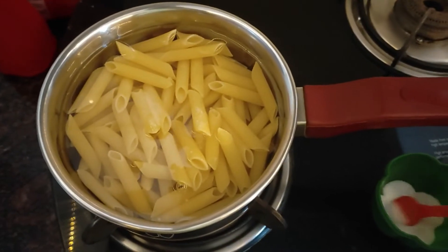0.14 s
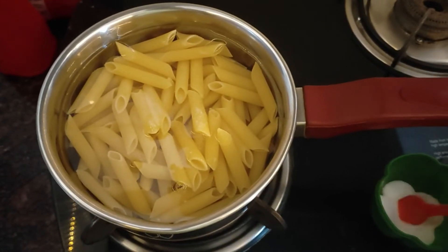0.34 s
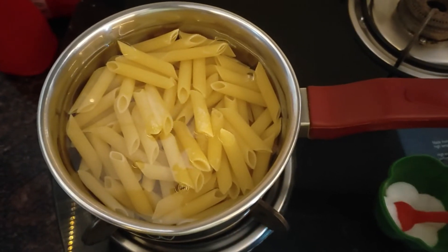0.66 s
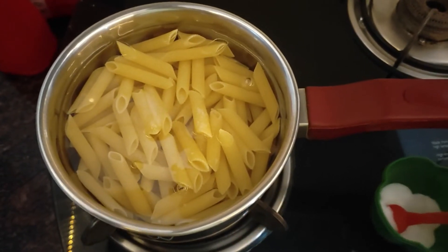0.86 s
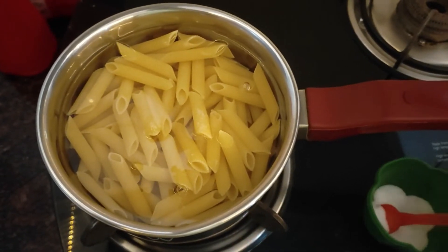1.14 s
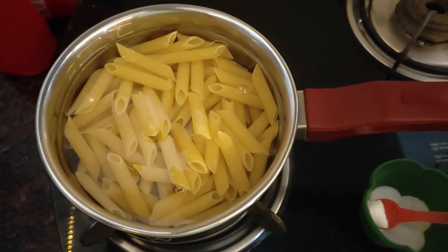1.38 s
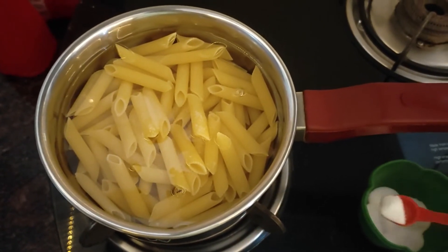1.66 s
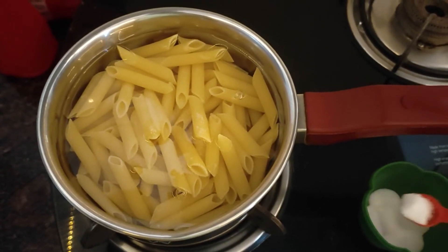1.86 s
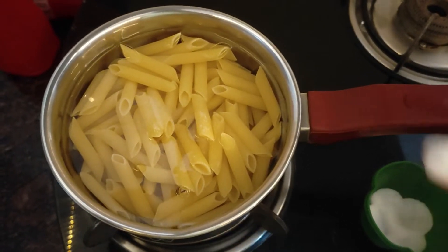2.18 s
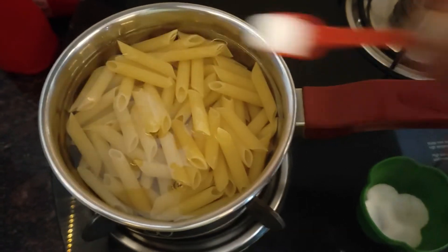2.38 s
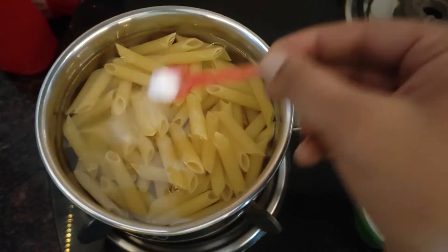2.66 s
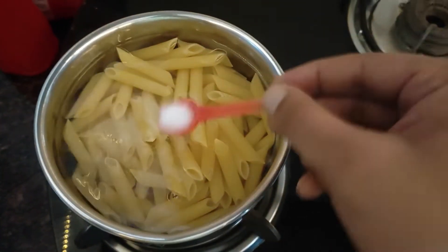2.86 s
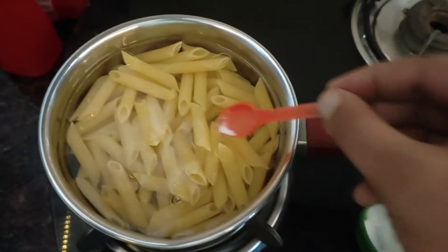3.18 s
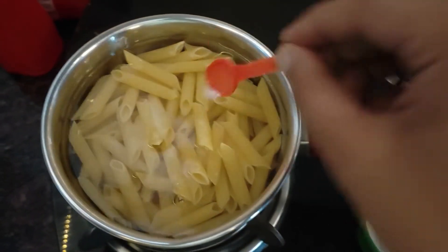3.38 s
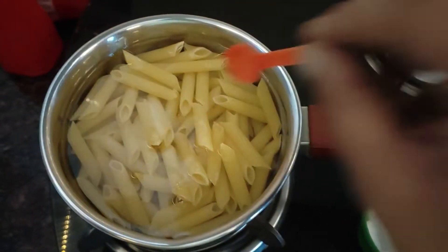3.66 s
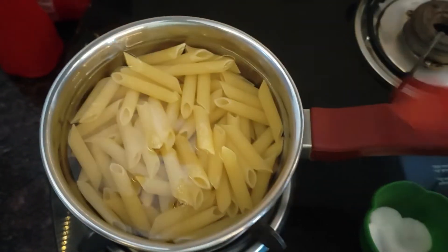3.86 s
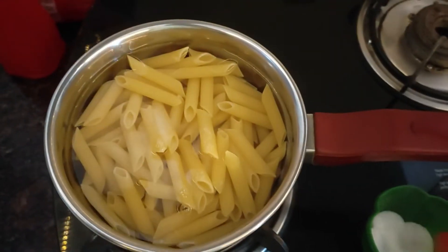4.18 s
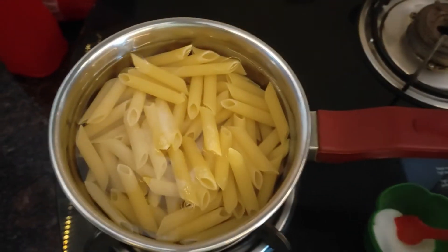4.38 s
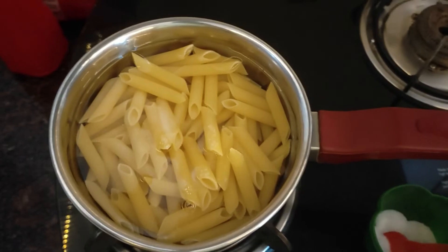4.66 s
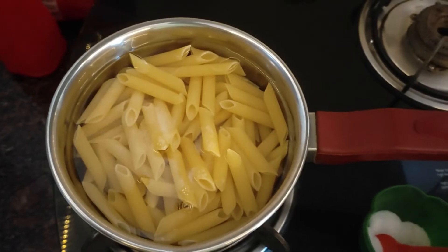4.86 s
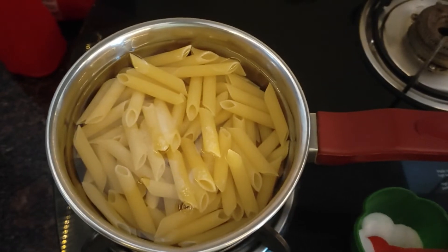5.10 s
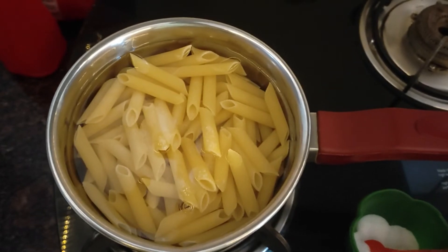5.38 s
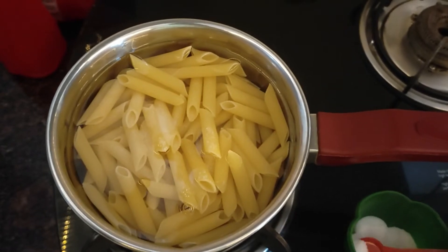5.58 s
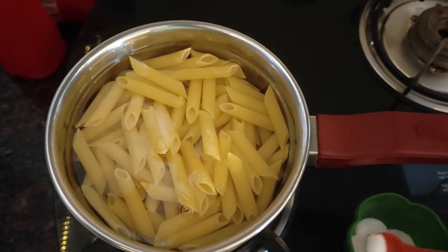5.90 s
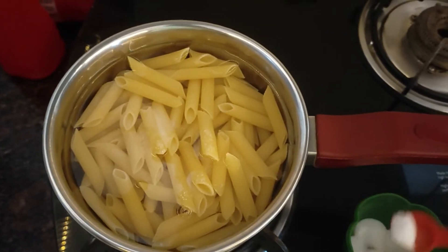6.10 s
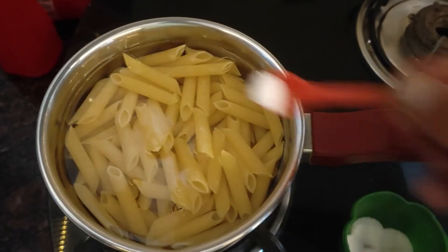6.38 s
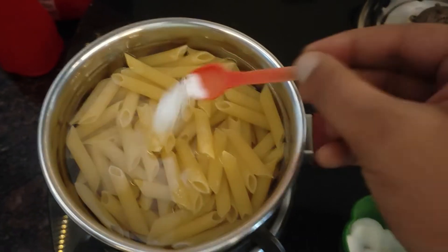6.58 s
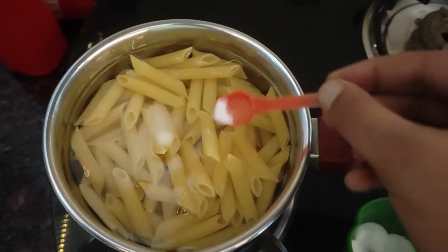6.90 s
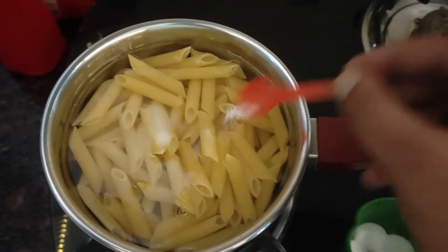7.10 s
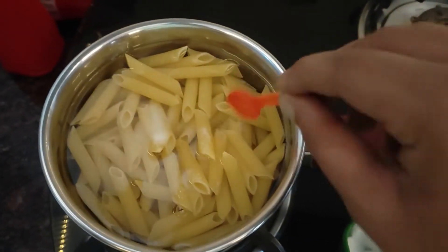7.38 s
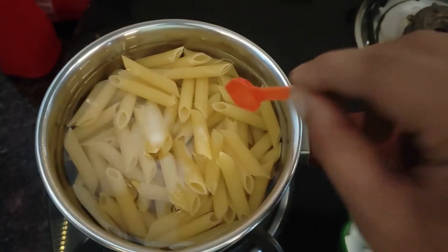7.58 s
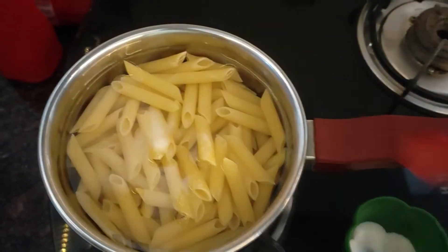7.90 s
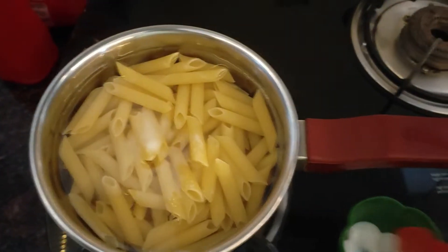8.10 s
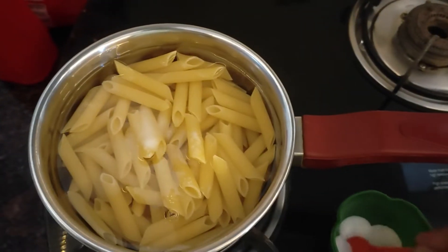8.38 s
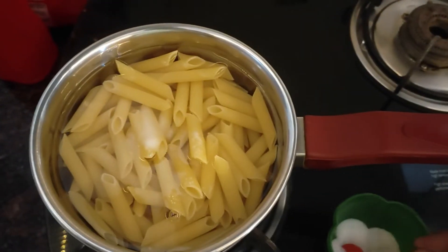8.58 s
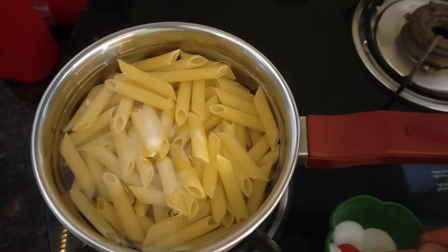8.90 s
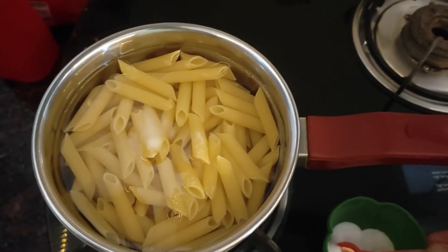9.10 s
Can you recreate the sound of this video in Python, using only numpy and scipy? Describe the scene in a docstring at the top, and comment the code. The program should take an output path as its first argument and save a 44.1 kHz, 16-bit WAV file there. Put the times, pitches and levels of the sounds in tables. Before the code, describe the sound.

Low flame rumble and fan hum in a small kitchen, a muffled engine swelling past beyond the walls, with crunchy salt scoops and spoon clacks.

```python
"""In a small kitchen, a gas burner rumbles and hisses (shaped noise) under a steel pot of pasta, by a humming fan.
A motor vehicle revs up and passes outside, dull through the walls: engine harmonics and noise, tyre noise,
and low street drones from sines and noise.
A plastic spoon scoops salt from a bowl: knocks, taps and a counter bump ring decaying modes, scrapes are bursts
of noisy grains, ticks are tiny sine pops. Thin whistles of narrow noise swell and fade."""
import sys
import numpy as np
from scipy import signal
from scipy.fft import rfft, irfft, next_fast_len
from scipy.io import wavfile
from scipy.ndimage import uniform_filter1d

SR = 44100
rng = np.random.default_rng(int(sys.argv[2]) if len(sys.argv) > 2 else 0)


def transcribe(u):
    """Save the signal u as a 16-bit wav file named by the first command-line argument.

    u: samples, shape (n,) or (channels, n), limited to [-1, 1]; the rate is SR.
    q: integer samples, one column per channel.
    """
    v = np.clip(np.atleast_2d(u).T, -1, 1)
    q = np.round(v * 32767).astype(np.int16)
    wavfile.write(sys.argv[1], SR, q)


N = 407925
TIME = np.arange(N) / SR


def undb(db):
    """Decibels to gain."""
    return 10 ** (np.asarray(db) / 20)


def unit(x):
    """Scale to rms 1."""
    return x / np.sqrt(np.mean(x ** 2))


def curves(table):
    """Each column of a timed table, sample by sample."""
    s, *columns = np.transpose(table)
    return [np.interp(TIME, s, c) for c in columns]


def db_at(spectrum, hz):
    """Read a spectrum on a log-frequency axis; past its ends it falls 60 dB per octave."""
    f, db = np.transpose(spectrum)
    octave, points = np.log2(np.maximum(hz, 1)), np.log2(f)
    outside = np.abs(octave - np.clip(octave, points[0], points[-1]))
    return np.interp(octave, points, db) - 60 * outside


def colour(x, spectrum, tilt_db=0):
    """Shape a sound by a spectrum and a tilt in dB per octave; rms 1."""
    size = next_fast_len(len(x))
    hz = np.arange(size // 2 + 1) * SR / size
    gain = undb(db_at(spectrum, hz) + tilt_db * np.log2(hz + 1))
    return unit(irfft(rfft(x, size) * gain, size)[:len(x)])


def noise(spectrum):
    """Turbulence with a given spectrum."""
    return colour(rng.standard_normal(N), spectrum)


def walk(rate):
    """Smooth random wander with rms 1, taking about rate steps a second."""
    k = int(SR / rate)
    steps = np.repeat(rng.standard_normal(N // k + 2), k)[rng.integers(k):][:N]
    return unit(uniform_filter1d(uniform_filter1d(steps, k), k))


def turn(hz):
    """Phase of a moving frequency, from a random start."""
    return 2 * np.pi * np.cumsum(hz) / SR + rng.uniform(0, 2 * np.pi)


def add(out, s, sound):
    """Mix a sound in at time s."""
    i = int(s * SR)
    out[i:i + len(sound)] += sound[:N - i]


def onset(s, rise_s):
    """A smooth step from 0 to 1 around time s."""
    return .5 + .5 * np.tanh((TIME - s) / (2 * rise_s))


def swell(middle_s, length_s):
    """A smooth rise from 0 to 1 and back."""
    return np.cos(np.pi * np.clip((TIME - middle_s) / length_s, -.5, .5)) ** 2


def passing(loudest_s, reach_s, falloff_db=15.5):
    """Level in dB of a source driving by; in reach_s it covers its own distance from the house."""
    return -falloff_db * np.log10(1 + ((TIME - loudest_s) / reach_s) ** 2)


# Flame rumble and room. Each row: frequency in Hz, density in dB per Hz.
FLAME_SPECTRUM = [(36, -25.5), (50, -10.5), (62, -4.5), (74, -13), (90, 1), (105, 1.5), (124, -11),
                  (135, -12), (180, -12), (200, -6.5), (225, -17.5), (250, -24.5), (292, -19.5), (320, -19),
                  (380, -14), (410, -23), (500, -16.5), (700, -22.5), (850, -43)]
# Gas jet hiss. Each row: frequency in Hz, density in dB per Hz.
JET_SPECTRUM = [(600, -0.5), (800, 5.5), (1250, 0.5), (1800, -5), (2350, -9), (2650, -16.5), (3350, -19),
                (3750, -28.5), (4900, -28.5), (6200, -22.5), (7600, -27.5)]


def burner(flame_db=-41.5, jet_db=-56, flicker_db=1.37):
    """The flame rumbles steadily; the gas jet hisses through the ports and flickers."""
    flame = noise(FLAME_SPECTRUM) * undb(flame_db)
    jet = noise(JET_SPECTRUM) * undb(jet_db + flicker_db * walk(15))
    return flame + jet


# Fan lines. Each row: multiple of the blade rate, level in dB rms before waver, waver in dB.
FAN_LINES = [(2.99, -58, 2), (4.007, -49, 1.5), (5.99, -44.5, 1.5), (6.98, -52, 1.9), (13.98, -56.5, 3.1)]
# Faint, broken hum beside them. Each row: frequency in Hz, density in dB per Hz.
HUM_SPECTRUM = [(276, -18.5), (290, 1.5), (304, -16.5)]


def fan(blade_hz=14.2, hum_db=-54):
    """Sines near multiples of the blade rate waver in level, beside a hum of narrow, unsteady noise."""
    lines = 0
    for multiple, db, waver_db in FAN_LINES:
        line = unit(np.sin(turn(np.full(N, multiple * blade_hz))))
        lines = lines + line * undb(db + waver_db * walk(5))
    return lines + noise(HUM_SPECTRUM) * undb(hum_db)


# What the walls let through. Each row: frequency in Hz, density in dB per Hz.
WALL_SPECTRUM = [(110, -19.5), (128, -4), (145, -2.5), (160, -11), (174, -2.5), (184, -6), (198, -4),
                 (218, -1), (235, -5.5), (255, -14.5), (278, 5), (295, 2), (335, -9.5), (410, -8.5),
                 (445, -11.5), (470, -21.5), (530, -12), (570, -15.5), (612, -14), (720, -24)]


def engine_orders(cycle_hz, orders, odd_gain, smear, rough, drift=1.47, fade_db=2.0):
    """A group of engine harmonics; echoes along the street make each one fade and smear."""
    phase, tones, power = turn(cycle_hz), 0, 0
    for k in orders:
        # the walls' response changes slowly, so read it every 500 samples
        wall_db = np.interp(TIME, TIME[::500], db_at(WALL_SPECTRUM, k * cycle_hz[::500]))
        gain = undb(wall_db) * (odd_gain if k % 2 else 1)
        # the echo paths change as it drives, so the harmonics slide out of step
        angle = k * phase + rng.uniform(0, 2 * np.pi) + drift * walk(2) + smear * walk(10)
        fading = (1 + smear * walk(10)) * undb(fade_db * walk(2.464))
        tones = tones + gain * fading * np.sin(angle)
        power = power + gain ** 2
    edges = np.array([orders[0] - .5, orders[-1] + .5]) * np.median(cycle_hz)
    band = signal.butter(4, edges, "bandpass", fs=SR, output="sos")
    roar = signal.sosfilt(band, noise(WALL_SPECTRUM))
    # dividing by the total power evens out the level as the harmonics move
    return unit(unit(tones / np.sqrt(power)) + rough * unit(roar))


# Single exhaust notes that hum in the room. Each row: middle in seconds, length in seconds,
# order (multiple of the working cycle), level in dB rms at the middle before waver.
EXHAUST_SURGES = [(2.73, 1.1, 12, -46.5), (3.425, 0.64, 16, -35.5), (3.45, 0.53, 12, -55),
                  (3.834, 0.78, 16, -40.5), (4.16, 0.9, 12, -44.5), (4.353, 0.6, 16, -42.5),
                  (4.1, .5, 10, -46.5), (4.47, 0.39, 10, -38), (4.92, 0.56, 16, -38.5),
                  (4.85, 0.39, 14, -37.5), (5.4, 0.9, 14, -37.5), (5.25, .7, 10, -40), (2.8, 0.48, 22, -53),
                  (4.897, .8, 18, -44.5), (5.098, 0.87, 20, -42.5), (5.35, 0.46, 22, -44.5),
                  (5.1, 1.5, 30, -50.5), (4.7, 2.7, 6, -47), (8.3, 0.34, 14, -40), (8.25, .8, 7, -40),
                  (5.8, 0.59, 15, -36.5), (6.3, 0.66, 14, -38.5), (6.95, 0.84, 11, -32),
                  (7.4, 0.81, 15, -27.5), (7.445, 0.35, 9, -30), (7.496, 0.77, 10, -33.5),
                  (8.85, 1.4, 11, -39.5)]


def surges(cycle_hz, smear=.33, waver_db=2.0):
    """One harmonic after another stands out as the revs and the path into the room change."""
    out = 0
    for s, length_s, k, db in EXHAUST_SURGES:
        note = unit(np.sin(round(k) * turn(cycle_hz) + smear * walk(20)))
        out = out + note * swell(s, length_s) * undb(db + waver_db * walk(12))
    return out


# Engine speed. Each row: time in seconds, working cycles per second.
ENGINE_REVS = [(0, 16.4), (2.4, 16.5), (3.4, 18.1), (4, 19.3), (4.9, 20.45), (5.9, 20.4), (6.7, 20.1),
               (7.35, 19.35), (7.8, 19.2), (8.6, 20.6), (9.25, 19.7)]
# Deepest exhaust notes, heard from behind. Each row: order, loudest moment in seconds,
# level there in dB rms before waver, fade to either side in dB per second.
TAILPIPE_NOTES = [(5, 5.7, -33.5, 6.5), (7, 6.18, -35.5, 7)]
# Exhaust roar as the vehicle draws level. Each row: frequency in Hz, density in dB per Hz.
ROAR_SPECTRUM = [(150, -20), (172, -5), (200, -1), (228, -9.5), (255, -19.5), (280, -3), (300, 2),
                 (322, -10.5), (350, -11)]
# Rough rush of the engine under load. Each row: frequency in Hz, density in dB per Hz.
RUSH_SPECTRUM = [(165, -7), (190, 2), (225, -3), (255, -10.5), (295, 2.5), (345, -8), (375, -5), (415, -4),
                 (460, -14)]
THROTTLE_S, THROTTLE_RISE_S, IDLE_DB = 2.18, 0.25, -7.5  # opening, gradualness; idle level against open
# the tailpipe turns to face the house: moment, gradualness, gain in boom and drone
FACING_S, FACING_RISE_S, FACING_GAIN_DB = 5.52, 0.048, 2
ODD_FRONT_DB, ODD_REAR_DB = -15.5, 3  # odd orders against even, before and after the turn


def engine(boom_db=-38, drone_db=-38, buzz_db=-39.0):
    """It revs up and drives by: even firings dominate on the approach, odd orders once the tailpipe faces us."""
    cycle_hz, = curves(ENGINE_REVS)
    facing = onset(FACING_S, FACING_RISE_S)
    odd_db = ODD_FRONT_DB + (ODD_REAR_DB - ODD_FRONT_DB) * facing
    odd_gain = undb(odd_db)
    boom = engine_orders(cycle_hz, range(8, 13), odd_gain, smear=0.61, rough=0.58)
    boom = boom * undb(boom_db + passing(7.16, reach_s=2.21))
    drone = engine_orders(cycle_hz, range(13, 18), odd_gain, smear=0.55, rough=0.5)
    drone = drone * undb(drone_db + passing(6.4, reach_s=1.49))
    buzz = engine_orders(cycle_hz, range(18, 35), odd_gain, smear=0.7, rough=1.6)
    buzz = buzz * undb(buzz_db + passing(6.2, reach_s=2.04))
    throb = 0
    for k, loudest_s, db, fade in TAILPIPE_NOTES:
        note = unit(np.sin(round(k) * turn(cycle_hz) + 0.098 * walk(11.0)))
        level_db = db + odd_db - ODD_REAR_DB - fade * np.abs(TIME - loudest_s)
        throb = throb + note * undb(level_db + 2.0 * walk(8))
    exhaust = (boom + drone) * undb(FACING_GAIN_DB * facing)
    throttle = undb(IDLE_DB * (1 - onset(THROTTLE_S, THROTTLE_RISE_S)))
    roar = noise(ROAR_SPECTRUM) * swell(7.444, length_s=1.7) * undb(-29.5)
    rush = noise(RUSH_SPECTRUM) * swell(5.4, length_s=3.4) * undb(-41)
    return (exhaust + buzz + throb) * throttle + surges(cycle_hz) + roar + rush


# Tyre noise from the street. Each row: time in seconds, level in dB.
ROAD_LEVEL = [(0, -55.5), (.8, -54), (1.6, -57.5), (3.3, -57), (4.7, -51), (5.5, -46), (6, -48.5),
              (7.2, -48.5), (7.8, -53), (9.25, -52)]
# Tyre roar. Each row: frequency in Hz, density in dB per Hz.
TYRE_SPECTRUM = [(440, -33), (750, -1.5), (799, 1.5), (1050, -4.5), (1300, 1), (1420, -4.5), (1710, -1),
                 (2300, -7), (2890, -21), (3420, -20.5), (3730, -29.5), (5000, -30.5), (6500, -51.5),
                 (11000, -120)]
# High tyre hiss. Each row: frequency in Hz, density in dB per Hz.
HISS_SPECTRUM = [(3700, -11), (4900, -5), (5400, 0), (5750, 2), (6200, 6), (7600, 0.5)]


def tyres(flutter_db=1.15, hiss_db=-68.0, hiss_growth=0.97):
    """Tyres roar on the road with a flutter; their high hiss follows the level almost dB for dB."""
    road_db, = curves(ROAD_LEVEL)
    roar = noise(TYRE_SPECTRUM) * undb(road_db + flutter_db * walk(8))
    hiss = noise(HISS_SPECTRUM) * undb(hiss_db + hiss_growth * (road_db - road_db.max()))
    return roar + hiss


# Spoon in the salt. Each row: start in seconds, level in dB, decay length in seconds,
# treble tilt in dB per octave, ring in Hz.
SALT_SCRAPES = [(.29, -59.5, 0.037, 1, 5350), (.452, -54.5, 0.045, 1, 6360), (.61, -67, 0.023, 10, 6500),
                (1.125, -57, 0.02, 2, 5300), (1.805, -59, 0.051, 3, 6460), (1.84, -42.5, 0.031, -8.5, 3870),
                (1.942, -53, .008, -2.5, 2900), (2.099, -43, 0.013, -2.5, 3400),
                (2.138, -49, 0.018, 0, 2900), (2.181, -46.5, 0.026, -2, 6900),
                (2.21, -50.5, 0.016, -4, 6350), (2.359, -53, .005, -3, 2800),
                (2.379, -50.5, 0.006, 1, 3420), (2.402, -60, 0.011, 1, 4000), (3.56, -65, .012, 7, 6500),
                (3.635, -63.5, .016, 7, 6300), (3.738, -61.5, 0.009, 12, 6700),
                (3.775, -66, 0.029, 7, 6300), (3.99, -65, .03, 7, 6500), (4.128, -55.5, 0.024, 0.5, 7150),
                (4.28, -58.5, 0.033, 1, 5240), (4.35, -58, 0.024, 1, 4730), (5.40, -57, 0.028, 10, 6240),
                (5.49, -52, 0.012, 10, 6210), (5.78, -56, .008, 10, 6800), (8.02, -37, 0.014, 2, 7210),
                (8.183, -51, 0.064, 1.5, 5500), (8.202, -44, 0.004, 6, 5600), (8.345, -51, 0.035, -7, 2850),
                (8.374, -48, .012, -5, 2850), (8.421, -37.5, 0.028, 1, 2950), (8.464, -42, .004, -2, 2800),
                (8.488, -42, 0.008, -3, 3350), (8.675, -56, 0.0089, 1, 3300),
                (8.854, -47, 0.024, -0.5, 6150), (8.964, -49, 0.0088, 0, 6340),
                (9.117, -55.5, 0.055, 1, 3300)]
# Crunch of the salt. Each row: frequency in Hz, density in dB per Hz before the tilt.
SALT_SPECTRUM = [(700, -10.5), (1150, -6.5), (1450, -16), (1700, -2.5), (2000, -1.5), (2350, -3.5),
                 (2550, -19), (2800, -9.5), (3350, -7), (3800, -16.5), (4400, -16.5), (5400, -16),
                 (5900, -13), (7600, -14)]


def scrapes(grain_db=5, bite=0.13, ring=1.0, sharpness=7, judder_db=3.0):
    """Grains crunch in an uneven burst; a longer stroke bites more slowly, and each rings one resonance most."""
    out, t = np.zeros(N), TIME[:SR // 2]
    for s, db, length_s, tilt_db, hz in SALT_SCRAPES:
        sign, size = rng.standard_normal((2, len(t)))
        grains = colour(sign * undb(grain_db * np.minimum(size, 2)), SALT_SPECTRUM, tilt_db)
        grains = grains + ring * signal.lfilter(*signal.iirpeak(hz, sharpness, fs=SR), grains)
        stroke = (1 - np.exp(-t / (bite * length_s))) * np.exp(-t / length_s)
        burst = grains * stroke * undb(judder_db * walk(220)[:len(t)])
        # the stroke sets the energy, however the grains fall
        add(out, s, undb(db) * burst * np.linalg.norm(stroke) / np.linalg.norm(burst))
    return out


def struck(blows, modes, contact_s, detune=.012):
    """Each blow rings the modes of the object: brighter when hard, longer when loosely held."""
    out, t = np.zeros(N), TIME[:SR // 2]
    for s, db, tilt_db, sustain in blows:
        # the grip shifts every mode a little from blow to blow
        shifts = 1 + detune * rng.uniform(-1.1, 1, len(modes))
        ring = 0
        for (hz, mode_db, t60), shift in zip(modes, shifts):
            decay = np.exp(-np.log(1000) * t / (t60 * sustain))
            ring = ring + undb(mode_db + tilt_db * np.log2(hz)) * np.sin(2 * np.pi * hz * shift * t) * decay
        ring = ring * (1 - np.exp(-t / contact_s))  # contact time softens the attack
        add(out, s, undb(db) * ring / np.abs(ring).max())
    return out


# Hollow knocks. Each row: start in seconds, peak in dB, tilt in dB per octave, ring length factor.
BOWL_KNOCKS = [(1.125, -24.5, -1.5, 1.2), (8.022, -31, -1.5, 1.1), (8.863, -23, 1.5, 1.35),
               (8.918, -45, 1, .7)]
# Bowl modes. Each row: frequency in Hz, level in dB before tilt, t60 in seconds before the length factor.
BOWL_MODES = [(630, -13, 0.037), (723, -1, 0.039), (778, -1.5, 0.09), (886, -8, 0.11), (1020, -5.5, 0.058),
              (1274, -4, 0.066), (1417, 2, 0.045), (1480, -6, 0.11), (1530, 8, 0.024), (1640, -4, .05),
              (1750, -7.5, 0.028), (2190, -14.5, 0.05)]


def knocks():
    """The bowl's short, low modes give a hollow knock."""
    return struck(BOWL_KNOCKS, BOWL_MODES, contact_s=0.00091)


# Soft bump. Each row: start in seconds, peak in dB, tilt in dB per octave, ring length factor.
COUNTER_BUMPS = [(1.848, -28, -1.5, 1)]
# Counter modes. Each row: frequency in Hz, level in dB before tilt, t60 in seconds before the length factor.
COUNTER_MODES = [(148, -6, 0.18), (167.6, -2, 0.26), (190, 5, 0.15), (266, -1.5, 0.13), (449, -7, 0.29),
                 (462, -13, 0.15), (538, -6.5, 0.17), (960, -6.5, 0.12)]


def bumps():
    """A long, soft contact rings the counter's deep modes."""
    return struck(COUNTER_BUMPS, COUNTER_MODES, contact_s=0.0063)


# Spoon on bowl. Each row: start in seconds, peak in dB, tilt in dB per octave, ring length factor.
SPOON_CLACKS = [(2.099, -35.5, 4, 0.46), (8.023, -34, -7, 0.73), (8.426, -24, 2.5, 0.84)]
# Spoon modes. Each row: frequency in Hz, level in dB before tilt, t60 in seconds before the length factor.
SPOON_MODES = [(1436, -7, 0.14), (1747, -7.5, 0.17), (1924, -5, 0.13), (2200, -11, 0.14), (2334, 0.5, 0.09),
               (2750, 2.5, 0.061), (2857, 3.5, 0.055), (3050, 0, 0.084), (5300, -16, .09),
               (5660, -17, 0.075)]


def clacks():
    """The spoon clacks against the bowl: a hard, brief contact rings its modes."""
    return struck(SPOON_CLACKS, SPOON_MODES, contact_s=0.00036, detune=0.0032)


# Low drones from the street. Each row: middle in seconds, length in seconds, level in dB rms, pitch in Hz.
STREET_DRONES = [(2.62, 0.47, -42, 67), (4.85, 1.95, -38.5, 75.5)]


def street(waver_db=0.2):
    """Deep traffic drones swell and fade; a noisy rumble is left as the vehicle drives off."""
    drones = 0
    for s, length_s, db, hz in STREET_DRONES:
        tone = unit(np.sin(turn(np.full(N, hz))))
        drones = drones + tone * swell(s, length_s) * undb(db)
    wake = noise([(40, -18.5), (45, 3.0), (50, -14.0)]) * swell(8.4, length_s=2) * undb(-43)
    return drones * undb(waver_db * walk(4.4)) + wake


# Dry ticks. Each row: start in seconds, level in dB, pitch in Hz.
DRY_TICKS = [(2.631, -31.5, 1400), (2.790, -28, 1400), (7.347, -37, 5030), (8.914, -36.5, 3500)]


def ticks(cycles=0.57):
    """Tiny pops that rise and die within a few cycles."""
    out, t = np.zeros(N), TIME[:SR // 50]
    for s, db, hz in DRY_TICKS:
        age = hz * t / cycles
        envelope = (age * np.exp(1 - age)) ** 2
        add(out, s, undb(db) * np.sin(2 * np.pi * hz * t) * envelope)
    return out


# Thin high whistles. Each row: middle in seconds, level in dB, length in seconds, pitch in Hz,
# distance in Hz to where the band is 20 dB down.
HIGH_WHISTLES = [(2.787, -72, .08, 5500, 385), (2.89, -74, .05, 5400, 347), (2.947, -74, .075, 5440, 352),
                 (3.17, -75, .65, 6000, 60)]


def whistles():
    """Brief narrow hisses that swell and fade."""
    out = 0
    for s, db, length_s, hz, width in HIGH_WHISTLES:
        hiss = noise([(hz - width, -20), (hz, 0), (hz + width, -20)])
        out = out + undb(db) * swell(s, length_s) * hiss
    return out


# Spoon tip taps. Each row: start in seconds, peak in dB, tilt in dB per octave, ring length factor.
TIP_TAPS = [(8.022, -31.5, -2, 0.88), (8.204, -35, 4, 1), (8.426, -34, -3, 1.3), (8.491, -31, -11, 1.2)]
# Tip modes. Each row: frequency in Hz, level in dB before tilt, t60 in seconds before the length factor.
TIP_MODES = [(3280, -1.5, .026), (3390, -1, .034), (4590, -11.5, 0.022), (5320, -7, 0.024),
             (5940, -11.5, .035), (7200, -12.5, .025)]


def taps():
    """Light taps ring the high, short modes of the spoon's tip."""
    return struck(TIP_TAPS, TIP_MODES, contact_s=.0006, detune=.004)


def kitchen(x, t60=0.33, wet_db=-7):
    """Hard walls add a short dense tail of decaying noise."""
    t = TIME[:SR // 2]
    tail = rng.standard_normal(len(t)) * np.exp(-np.log(1000) * t / t60) * (t > .004)
    return x + undb(wet_db) * signal.fftconvolve(x, tail / np.linalg.norm(tail))[:N]


def scene():
    """Burner, fan and traffic, with the handling of the salt on top."""
    background = burner() + fan() + engine() + tyres() + street()
    handling = kitchen(scrapes() + knocks() + bumps() + clacks() + taps())
    return (background + handling + ticks() + whistles())[None]


def record(dry):
    """The phone cuts the top steeply above 7570 Hz."""
    return signal.sosfilt(signal.ellip(12, .2, 80, 7570, fs=SR, output="sos"), dry)


dry = scene()
out = record(dry)
transcribe(out)
```